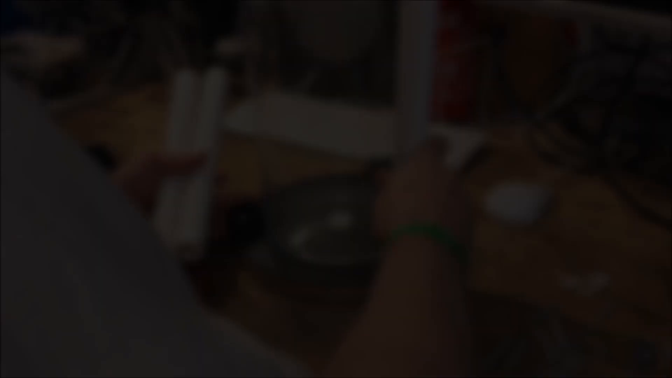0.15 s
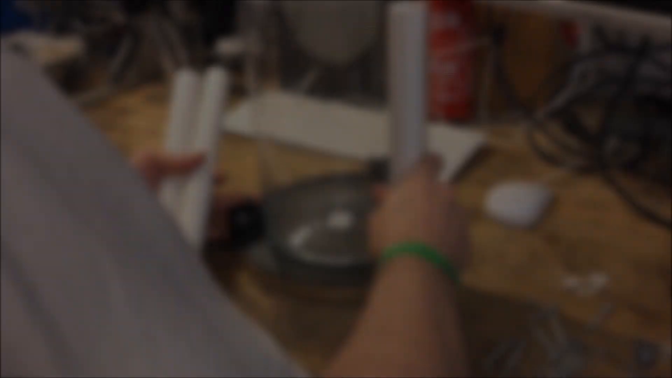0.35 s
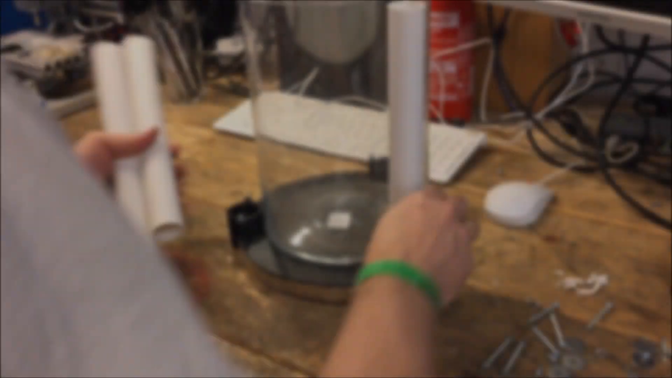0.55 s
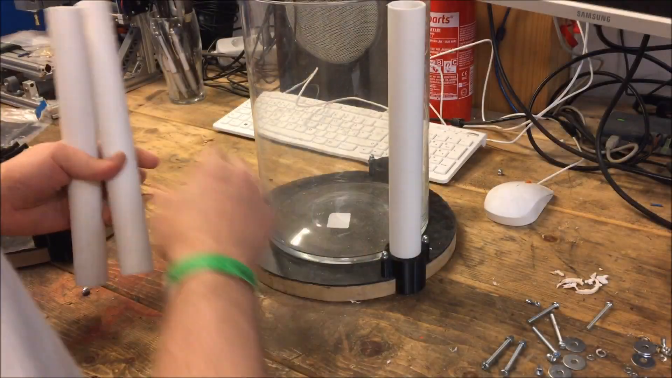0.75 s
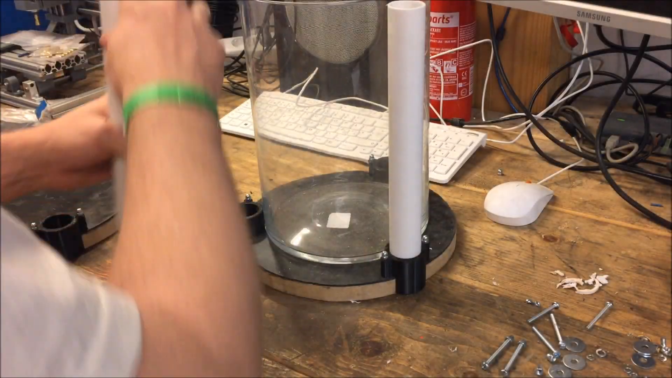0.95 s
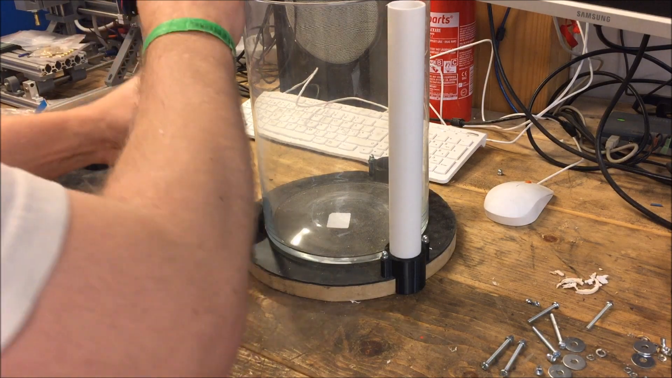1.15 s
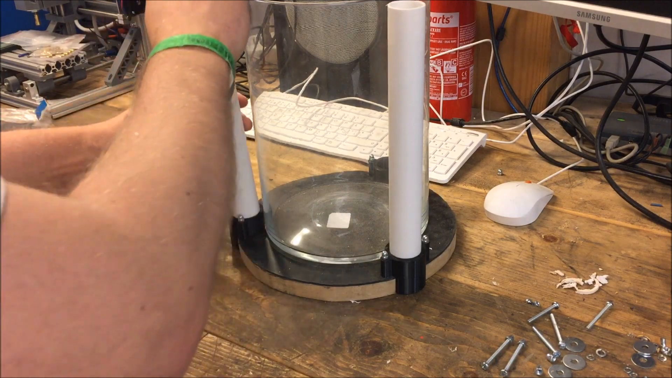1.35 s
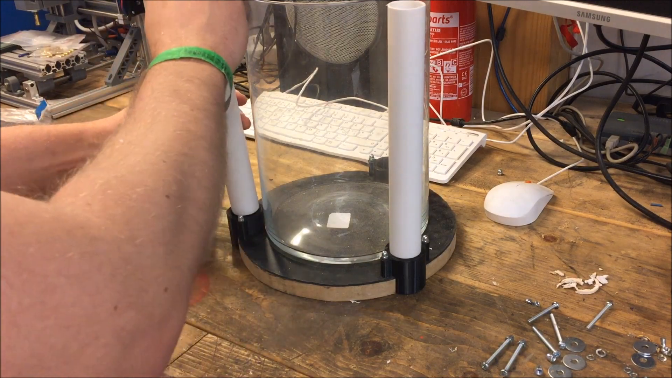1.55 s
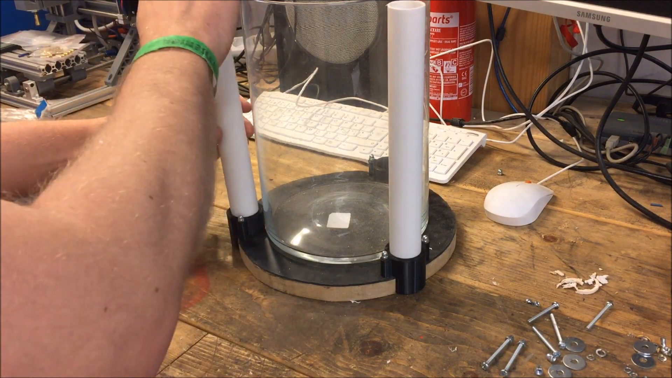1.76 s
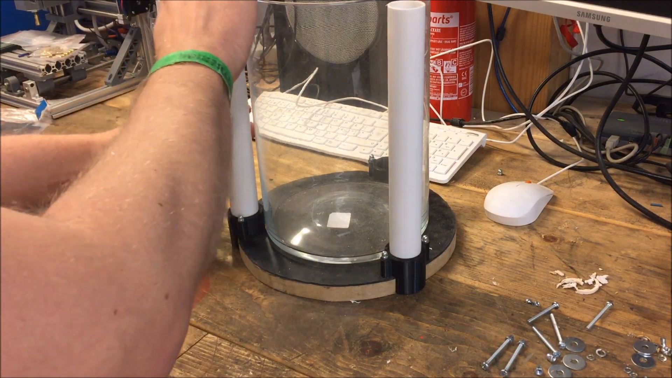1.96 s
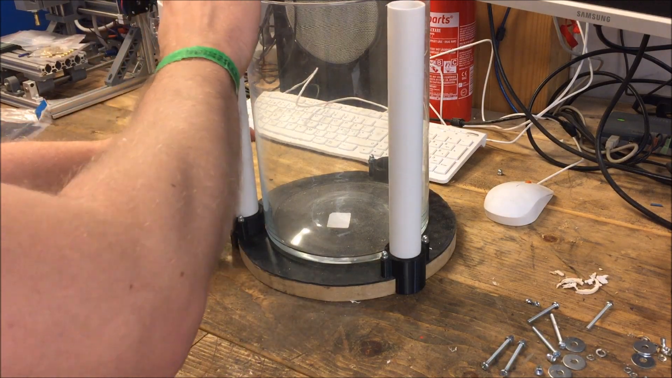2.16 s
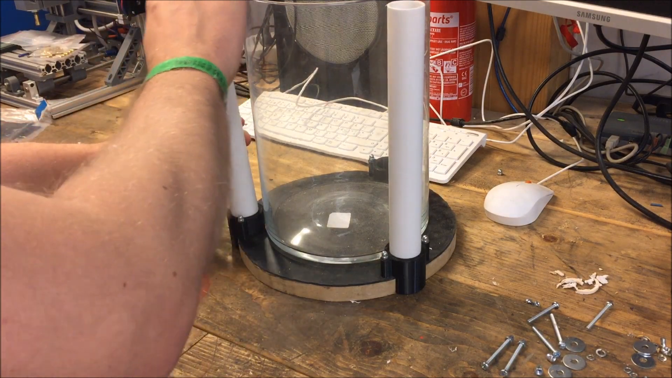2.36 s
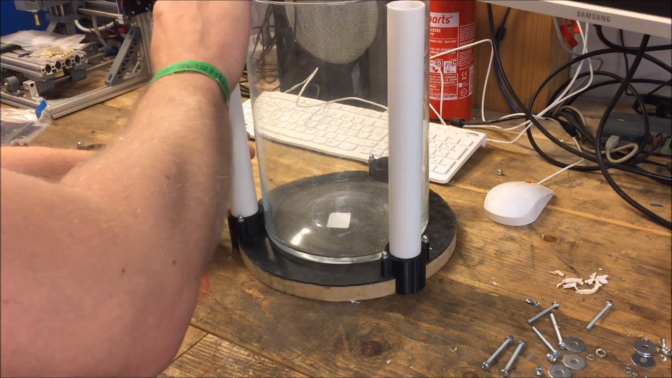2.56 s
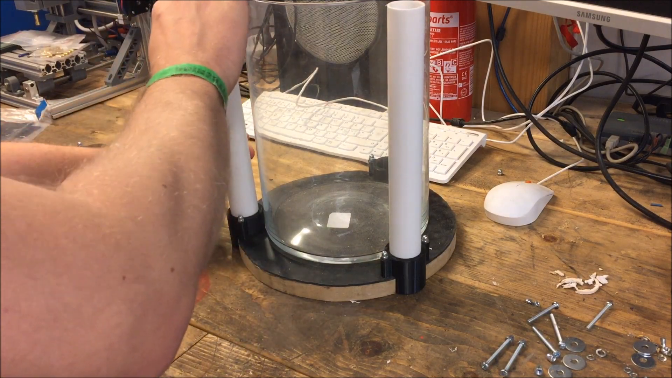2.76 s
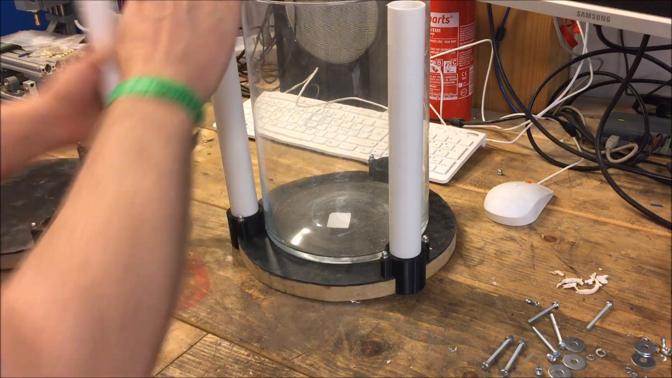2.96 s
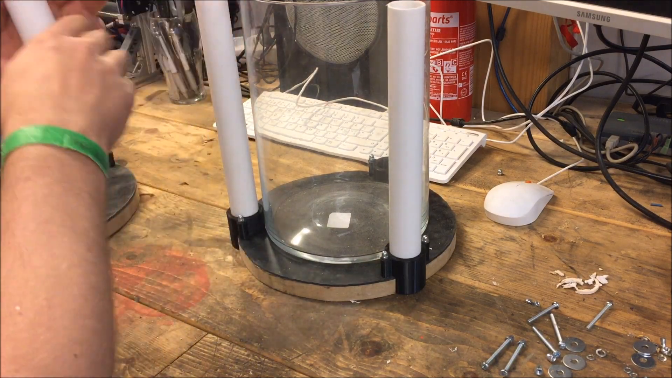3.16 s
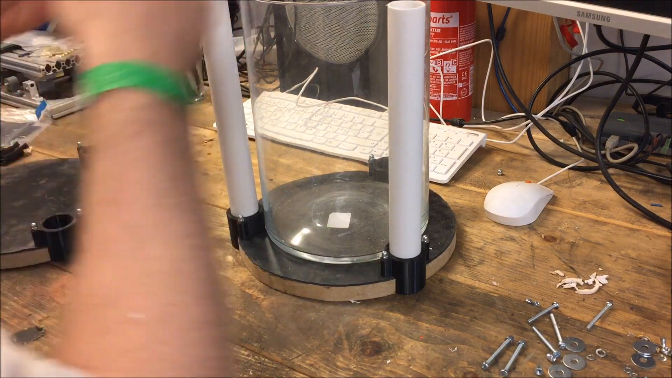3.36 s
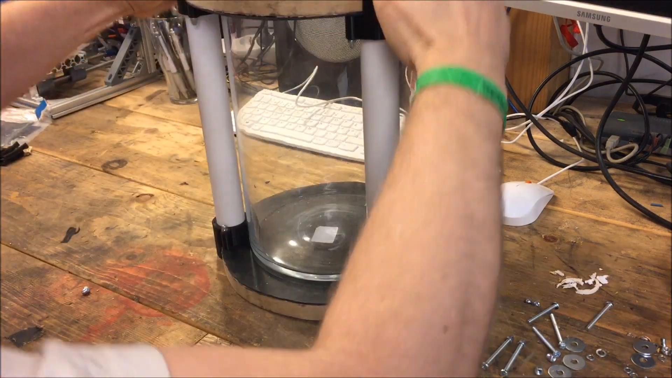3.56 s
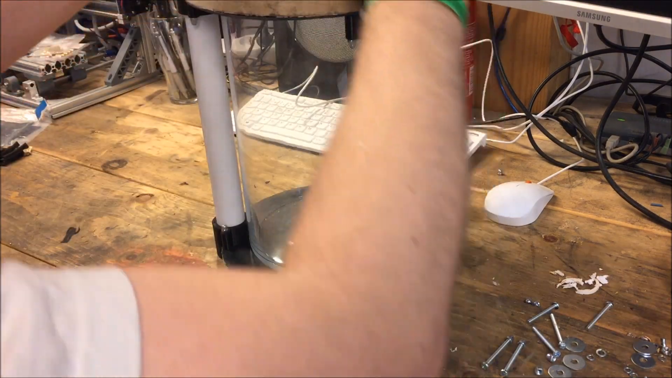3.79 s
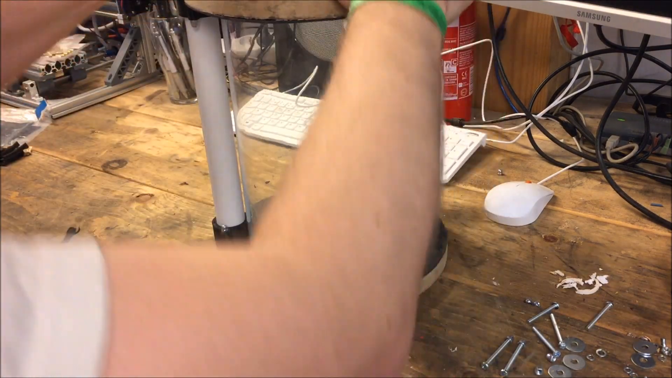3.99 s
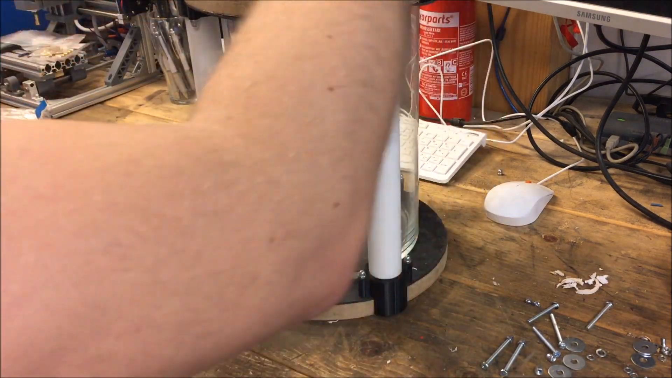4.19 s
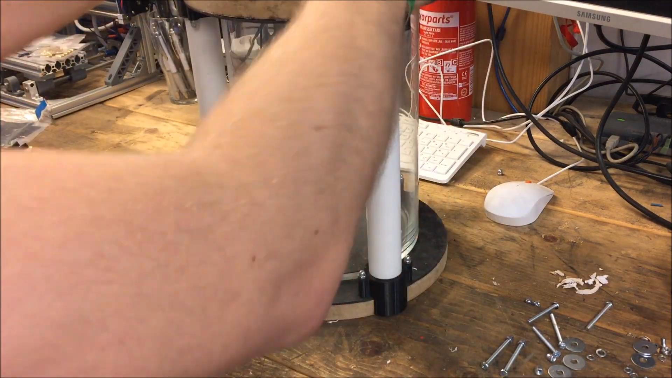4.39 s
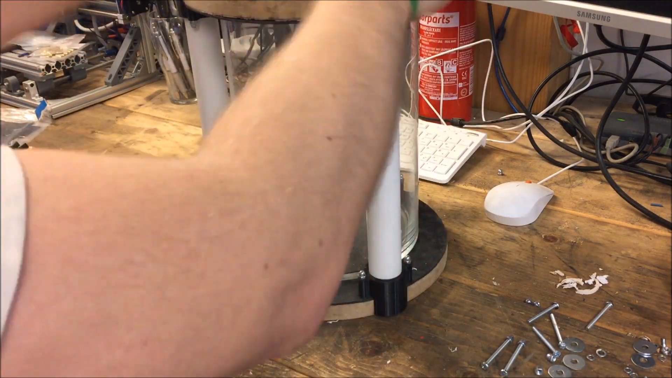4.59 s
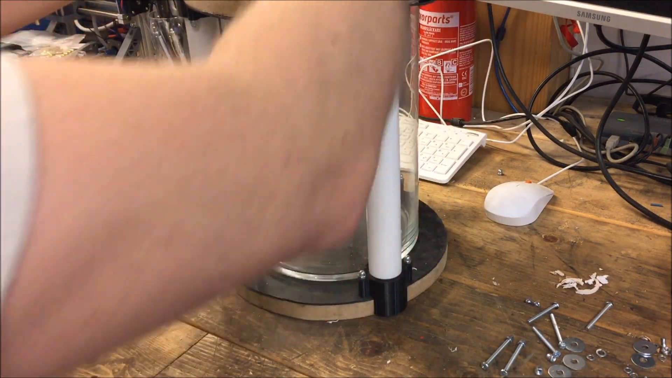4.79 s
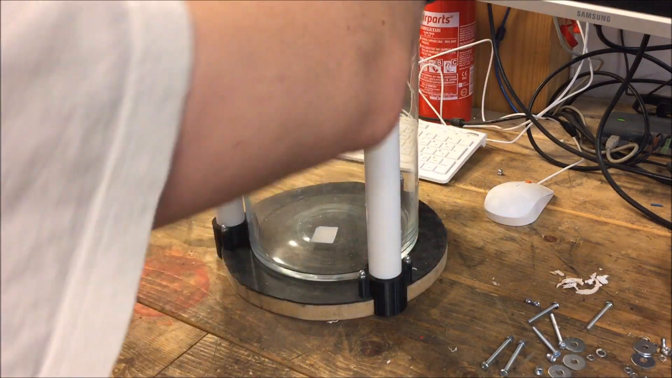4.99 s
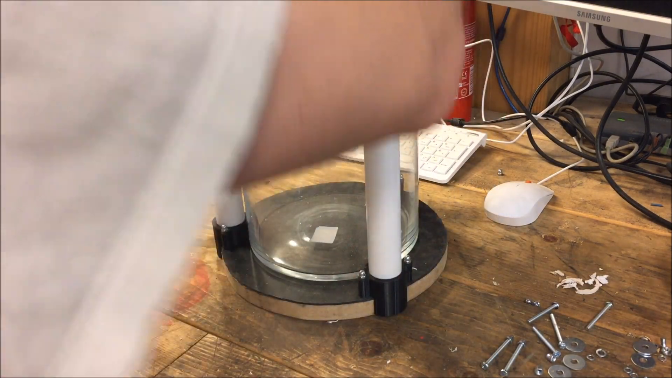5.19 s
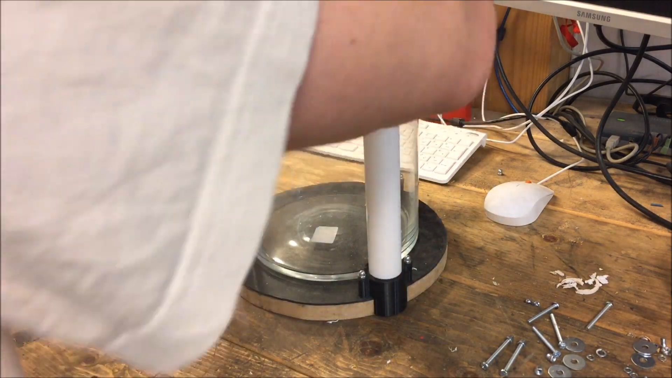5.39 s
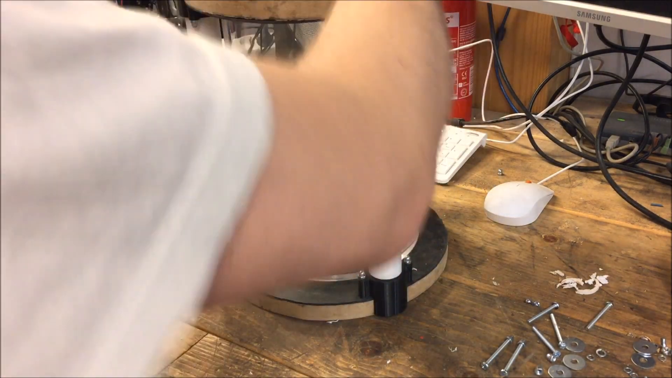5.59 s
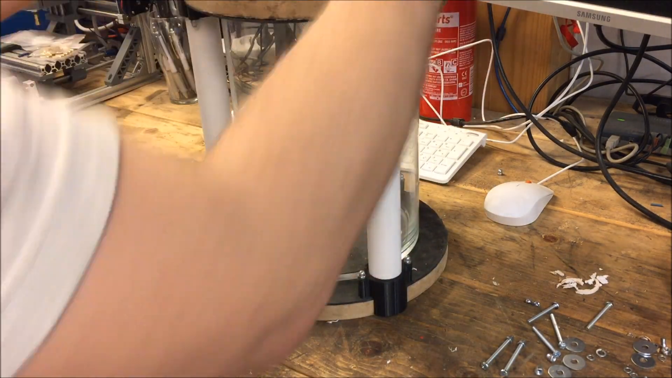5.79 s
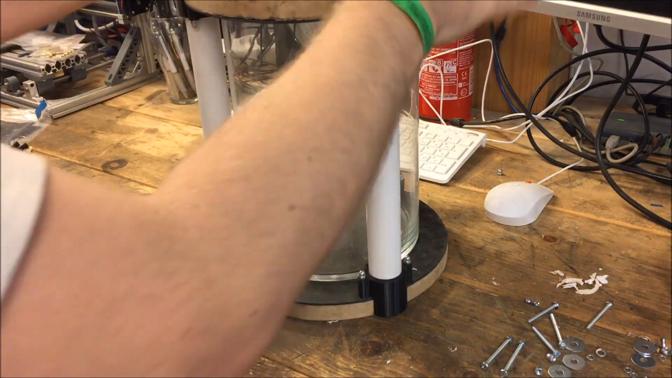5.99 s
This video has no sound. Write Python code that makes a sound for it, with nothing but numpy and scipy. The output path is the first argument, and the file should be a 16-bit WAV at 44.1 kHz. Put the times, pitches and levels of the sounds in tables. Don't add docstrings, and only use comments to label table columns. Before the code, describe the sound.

A small workshop, close microphone, with constant soft fan rush and two low motor hums beating several times a second. At about 0.4 s a short scrape ends in a bright crack and hollow plastic knock. Fine, fluttery hand rubs on plastic follow from 0.6 to 1.5 s. Small dry clicks and light hollow taps come at 1.6-1.75 s, then a crisp tap with a faint clear glass ring and buzz at 2.1 s. A firm pipe thud seats at 2.67 s. Hands rustle around 3-3.5 s. At 3.6 s a wooden plate lands loudly, hollow and rattling, with a duller glass ring. A light tick at 4.1 s, a knock at 4.47 s and a softer double knock near 4.74 s bring low bench booms. Soft shifting friction leads to a thud at 5.14 s, the hardest, sharpest crack at 5.4 s, a heavy booming blow at 5.7 s and a last low knock at 6.0 s.

```python
import sys
import numpy as np
from scipy import signal
from scipy.fft import rfft, irfft
from scipy.io import wavfile
from scipy.ndimage import uniform_filter1d

SR = 44100
rng = np.random.default_rng(int(sys.argv[2]) if len(sys.argv) > 2 else 0)


def attenuation_scalar(level_db):
    decades = np.asarray(level_db, float) / 20
    return 10 ** decades


def digitize_waveform(pressure):
    field = np.atleast_2d(pressure).T
    bounded = np.clip(field, -1, 1)
    quanta = np.round(bounded * 32767).astype(np.int16)
    wavfile.write(sys.argv[1], SR, quanta)


N = 266319


def evened(x):
    return x / np.sqrt(np.mean(x ** 2) + 1e-20)


def read(points, hz):
    f, value = np.transpose(points)
    return np.interp(np.log(hz + 1), np.log(f + 1), value)


def add(mix, start_s, sound):
    part = mix[round(start_s * SR):][:len(sound)]
    part += sound[:len(part)]


def colour(points, size, hz=1e3, lift_db=0, tilt_db=0):
    f = np.fft.rfftfreq(size, 1 / SR)
    octaves = np.log2((f + 20) / hz)
    lift = lift_db * np.exp(-(octaves / .5) ** 2)
    return evened(attenuation_scalar(read(points, f) + lift + tilt_db * octaves))


def coloured(gain):
    white = rng.standard_normal(2 * len(gain) - 2)
    return evened(irfft(rfft(white) * gain))


def ring(modes, t, spread_db, tilt_db=0, factor=1):
    luck = rng.standard_normal((len(modes), 2))
    total = 0
    for (hz, db, t60), (louder, sharper) in zip(modes, luck):
        level_db = db + spread_db * louder + tilt_db * np.log2(hz / modes[0][0])
        pitch_hz = hz * factor * (1 + 0.0024 * spread_db * sharper)
        total = total + attenuation_scalar(level_db - 60 * t / t60) * np.sin(2 * np.pi * pitch_hz * t)
    return total


# pitch_hz, level_db (per Hz)
FAN = [(18, -27), (30, -30), (93, -1), (121, -8.5), (153, -10.5), (336, -13.5), (415, -19.5), (540, -26.5),
       (666, -13.5), (760, -21.5), (1430, -17.5), (1960, -10.5), (4910, -34.5), (13000, -48.5),
       (16000, -47.5)]


def fan_rush():
    hz = np.fft.rfftfreq(1024, 1 / SR)
    a, b, patches = rng.standard_normal((N // 256 + 5, 513, 3)).T
    patches = evened(uniform_filter1d(uniform_filter1d(patches, 14, 0), 10, 1))
    frames = (a + 1j * b) * attenuation_scalar(read(FAN, hz)[:, None] + 2.5 * patches)
    rush = signal.istft(frames, nperseg=1024, noverlap=768)[1][:N]
    return attenuation_scalar(-52) * evened(rush)


# pitch_hz, width_hz, level_db
WHISTLES = [(406, 16.4, -62.5), (680, 45, -70), (840, 31, -69.5), (1952, 300, -59.5)]


def fan_whistles():
    t, out = np.arange(N) / SR, np.zeros(N)
    for hz, width_hz, db in WHISTLES:
        r = np.exp(-np.pi * width_hz / SR)
        white = rng.standard_normal(N) + 1j * rng.standard_normal(N)
        drift = signal.lfilter([1], [1, -2 * r, r * r], white)
        out += attenuation_scalar(db) * evened((drift * np.exp(2j * np.pi * hz * t)).real)
    return out


# pitch_hz, level_db
HUMS = [(100.03, -54.5), (105.65, -57)]


def motor_hums():
    t = np.arange(N) / SR - .603
    return sum(np.sqrt(2) * attenuation_scalar(db) * np.cos(2 * np.pi * hz * t) for hz, db in HUMS)


# centre_s, level_db, half_length_s
LEANS = [(.25, -69, .25), (.59, -57, .08), (1.102, -51.5, 0.12), (1.447, -56, 0.19), (2.033, -51.5, .17),
         (2.685, -60, 0.14), (3.01, -54, 0.052), (3.62, -61, 0.22), (4.156, -50.5, .13), (4.577, -47, 0.12),
         (4.9, -51, 0.2), (5.468, -53, .15), (5.949, -49.5, .3)]


def bench_tremble():
    t = np.arange(N) / SR
    wander = evened(uniform_filter1d(uniform_filter1d(rng.standard_normal(N), 4000), 4000))
    turns = np.cumsum(76 * (1 + 0.0711 * wander)) / SR
    level = attenuation_scalar(-65.5) + sum(attenuation_scalar(db) * np.exp(-((t - s) / half) ** 2) for s, db, half in LEANS)
    return np.sqrt(2) * attenuation_scalar(2.0) * level * np.sin(2 * np.pi * turns)


# firmest_s, level_db, coming_s, leaving_s
RUBS = [(.001, -68, .01, 0.15), (.33, -74, .03, .02), (.635, -55.5, 0.067, 0.096),
        (.684, -64, 0.083, 0.036), (.8, -63.5, 0.058, .04), (.924, -58, .04, 0.02), (.994, -68, .05, .05),
        (1.058, -53.5, 0.014, 0.063), (1.125, -65, .02, 0.13), (1.19, -60, 0.018, 0.17),
        (1.388, -65, 0.02, 0.037), (1.464, -69, .028, .015), (2.778, -60, .009, .016),
        (2.95, -63, 0.032, .04), (3.005, -68, .03, .03), (3.08, -62.5, 0.11, 0.15),
        (3.296, -59, .034, .023), (3.336, -52, 0.022, 0.035), (3.448, -55, 0.076, 0.035),
        (3.56, -68, .14, 0.038), (4.062, -71, .09, .03), (4.2, -78, 0.083, .09)]
# pitch_hz, level_db (per Hz)
SKIN = [(2500, -17), (5000, -3.5), (9000, -1.5), (13000, 0.5), (15500, 1)]


def hand_rubs():
    t, level = np.arange(N) / SR, np.zeros(N)
    for s, db, come, leave in RUBS:
        away = np.maximum((s - t) / come, (t - s) / leave)
        level += attenuation_scalar(db - 20 * away)
    flutter = evened(uniform_filter1d(rng.standard_normal(N), 120))
    slips = rng.exponential(1, N) * (rng.random(N) < 150 / SR)
    flecks = uniform_filter1d(6 * slips, 40)
    hiss = coloured(colour(SKIN, 2 ** 19))[:N]
    return level * hiss * attenuation_scalar(1.7 * flutter) * (1.0 + flecks)


# start_s, level_db (peak), pitch_hz, t60_s
BOOMS = [(.395, -31, 58.3, .2), (1.64, -45, 60.7, .3), (2.667, -36, 61.6, 0.4), (3.609, -31.5, 63.4, 0.61),
         (3.86, -42, 67, 0.17), (4.1, -41, 57.7, .32), (4.475, -19.5, 56.6, .26), (4.741, -14.5, 60.2, .21),
         (5.141, -25.5, 59.1, 0.39), (5.4, -17.5, 60.1, 0.18), (5.7, -12.5, 60.5, 0.23),
         (5.41, -33, 151.6, 0.46), (4.49, -37, 149.4, 0.5), (6.017, -23, 75, .3)]


def bench_booms():
    out, t = np.zeros(N), np.arange(SR // 2) / SR
    swing_up_s = 0.045
    for s, db, hz, t60 in BOOMS:
        rise = np.sin(np.pi / 2 * np.minimum(t / swing_up_s, 1))
        decay = attenuation_scalar(-60 * np.maximum(t - swing_up_s, 0) / t60)
        shape = uniform_filter1d(rise * decay, 900)
        add(out, s, attenuation_scalar(db) * shape * np.sin(2 * np.pi * hz * t))
    return out


# pitch_hz, t60_s
ROOM = [(60, 1), (160, 0.61), (420, 0.38), (1100, 0.55), (2900, 0.39), (7700, 0.3), (14000, 0.23)]


def room(x, early_db):
    taps = np.zeros(SR)
    at = np.arange(80, SR - 12, 12)
    places = at + rng.integers(0, 12, len(at))
    signs = rng.choice([-1., 1.], len(at))
    taps[places] = signs * (1 + attenuation_scalar(early_db - 60 * at / SR / 0.041))
    hz, t, z = signal.stft(taps, SR, nperseg=256)
    tail = signal.istft(z * attenuation_scalar(-60 * t / read(ROOM, hz)[:, None]), SR, nperseg=256)[1]
    return signal.fftconvolve(x, tail / np.linalg.norm(tail))[:N]


# pitch_hz, level_db, t60_s
GLASS = [(1104, 2.5, .46), (1669, -9, .35), (2293, -2, .28), (2697, -6, .2), (2840, -6, .12),
         (3375, -2, .28), (3774, -7, .75), (3838, -12, .3), (4165, -14, .23), (4390, -8, .33),
         (5195, -17, .3), (6202, -13, .27), (6686, -8, .1), (6998, -15, .2)]
# start_s, level_db, tilt_db (per octave), pitch_hz (lowest), damping_db (per s)
GLASS_TAPS = [
    (2.105, -35.5, 2.5, 1105, 31),
    (3.611, -25.5, -7.5, 1079, 163),
]


def glass():
    out, t = np.zeros(N), np.arange(SR // 2) / SR
    for s, db, tilt_db, hz, damping_db in GLASS_TAPS:
        shape = attenuation_scalar(db - damping_db * t) * (1 - np.exp(-t / 0.005))
        add(out, s, shape * ring(GLASS, t, 0, tilt_db, hz / GLASS[0][0]))
    return out


# start_s, end_s, start_db, end_db, tilt_db (per octave)
SLIDES = [(0.334, .358, -50, -45, -3.5), (.363, 0.393, -46, -22, 1.5), (1.636, 1.655, -39, -49, 3.5),
          (1.74, 1.753, -41, -43, -1.5), (2.623, 2.667, -40.5, -37.5, -.1),
          (3.593, 3.618, -36.5, -14, -3.5), (4.084, 4.106, -53.5, -37.5, -3),
          (4.46, 4.482, -36.5, -41, -0.5), (4.727, 4.762, -46, -55, 2.5), (4.842, 5.063, -43, -54, -9),
          (5.1318, 5.142, -34.5, -22.5, 3.5), (5.387, 5.397, -27, -13.5, 2), (5.688, 5.702, -38, -26, -3.5),
          (6.003, 6.015, -46, -28, 4), (6.017, 6.029, -33, -42, 1.5)]
# pitch_hz, level_db (per Hz)
EDGE = [(150, -23.5), (400, -0.5), (1000, -2.5), (2000, -5.5), (3500, -8), (6000, -15), (10000, -19.5),
        (16000, -29)]


def slides():
    out = np.zeros(N)
    for start, end, first_db, last_db, tilt_db in SLIDES:
        size = round((end - start) * SR)
        hiss = coloured(colour(EDGE, 16384, tilt_db=tilt_db))[:size]
        level = attenuation_scalar(np.linspace(first_db, last_db, size))
        add(out, start, level * hiss * signal.windows.tukey(size, .15))
    return out


# start_s, level_db (peak), pitch_hz (brightest), tilt_db (per octave)
TICKS = [
    (1.461, -29, 3380, -1.5),
    (1.6305, -14.5, 1690, -1),
    (1.638, -18.5, 3460, 3.5),
    (1.7405, -26, 2500, -4.5),
    (1.7492, -14, 2630, -2.6),
    (2.702, -23, 1200, -10),
    (5.3934, 2.5, 2320, 2.5),
]
CRACKS = [(.393, -13, 3360, -1.1), (1.6195, -25, 1900, -3), (1.72, -25.5, 1310, -6), (2.104, -12, 2770, 4),
          (2.6645, -22.5, 2020, 0.8), (2.91, -43, 2900, -1), (3.292, -33, 5960, 3.5),
          (4.0955, -31.5, 2000, 0.7), (4.4708, -14, 1930, -5), (4.4754, -22, 1240, 1.2),
          (4.73, -36.5, 4200, -7), (4.745, -30, 2670, 4.5), (5.1335, -26, 2820, 5),
          (5.1385, -9.5, 1900, -3.2), (5.692, -14, 2100, 1.1), (5.722, -23, 1500, -2),
          (6.013, -12, 2920, -2.5), (6.0205, -18, 2700, 2.2)]
RATTLES = [
    (2.107, -21, 5260, 3),
    (2.13, -36, 6140, 2.5),
    (2.196, -35, 3300, -1.3),
    (3.606, -16, 1710, 0.9),
    (5.396, -11.5, 1994, -8),
    (5.696, -18.5, 1450, -3),
]


def cracks():
    near, walls, t = np.zeros(N), np.zeros(N), np.arange(4096) / SR
    for rows, t60 in (TICKS, .0065), (CRACKS, .013), (RATTLES, .034):
        for s, db, hz, tilt_db in rows:
            gain = colour(EDGE, 4096, hz, lift_db=8, tilt_db=tilt_db)
            shape = (1 - np.exp(-t / 0.00028)) * attenuation_scalar(-60 * t / t60)
            burst = attenuation_scalar(db - 2) * shape * coloured(gain)
            add(near, s, burst)
            click = np.roll(irfft(gain), 256)[:512]
            add(walls, s - 256 / SR, np.linalg.norm(burst) * click)
    return near, walls


def knocks(hits, modes, cycles, chatter_t60):
    out, t = np.zeros(N), np.arange(SR // 3) / SR
    for s, db, hz, ring_db in hits:
        t60 = (cycles[0] - cycles[1] * db) / hz
        build = 1 - np.exp(-1.5 * hz * t)
        thud = build * attenuation_scalar(-60 * t / t60) * np.sin(2 * np.pi * hz * t)
        chatter = attenuation_scalar(-60 * t / chatter_t60) * rng.standard_normal(len(t))
        hollow = signal.fftconvolve(ring(modes, t, spread_db=1.2), chatter)[:len(t)]
        add(out, s, attenuation_scalar(db) * (thud / abs(thud).max() + attenuation_scalar(ring_db) * hollow / abs(hollow).max()))
    return out


# start_s, level_db (peak), pitch_hz (thud), ring_db (against the thud)
PIPE_HITS = [(.343, -33, 680, -18), (.3655, -24.5, 750, -7), (.3932, -11.5, 578, -12.5),
             (.397, -19, 675, -6.5), (.400, -17, 281, -9.5), (1.448, -37, 470, 1.7),
             (1.618, -29.5, 520, -7), (1.638, -26.5, 293, 2.5), (1.722, -36, 470, -4),
             (1.741, -26.5, 510, 2), (1.941, -40, 266, -3.5), (2.106, -34.5, 391, 2.8),
             (2.6655, -10.5, 660, -6.5), (2.671, -15, 411, -9.5), (2.7025, -22.5, 786, -8.5),
             (2.91, -44, 342, -2), (3.01, -48.5, 550, -3)]
# pitch_hz, level_db, t60_s
PIPE = [(264.4, 2.5, 0.084), (400, -2, 0.042), (438, -6, 0.045), (590, -4.5, 0.078), (680, -2.5, 0.027),
        (805, -15, 0.037), (900, -11, 0.051)]


def pipes():
    return knocks(PIPE_HITS, PIPE, cycles=(2.7, 0.52), chatter_t60=0.12)


# start_s, level_db (peak), pitch_hz (thud), ring_db (against the thud)
PLATE_HITS = [(3.594, -24, 690, -2), (3.608, -7.5, 470, -5.5), (3.610, -6, 233, -17),
              (4.095, -34.5, 334, 0), (4.476, -14.5, 284, -7), (4.731, -36.5, 480, 2),
              (4.744, -23.5, 198, -4.5), (4.764, -29, 517, 3), (5.143, -15, 400, -8.5),
              (5.146, -20.5, 143.6, -24.5), (5.158, -25.5, 210, -19), (5.3932, -4, 1110, -15.5),
              (5.400, -15, 297, -6.5), (5.696, -14.5, 594, -6), (5.700, -10, 156.3, -16),
              (6.016, -35, 400, 0), (6.018, -15, 122, -10.5)]
# pitch_hz, level_db, t60_s
PLATE = [(144.4, -4.5, 0.12), (195, -7, 0.062), (282.7, -6, 0.064), (378, -11.5, 0.091), (470, -13, 0.038),
         (590, -7, 0.054), (680, -9.5, 0.05), (827, -14, 0.032), (1052, -20.5, 0.041), (1190, -22, 0.052)]


def plate():
    return knocks(PLATE_HITS, PLATE, cycles=(4, 0.072), chatter_t60=0.2)


def scene():
    steady = fan_rush() + fan_whistles() + motor_hums()
    near, walls = cracks()
    scrapes, rings = slides(), glass()
    hollow = pipes() + plate()
    wet = attenuation_scalar(-6) * room(walls + attenuation_scalar(-3) * scrapes + rings / 5, early_db=9.0)
    wet += attenuation_scalar(-11.0) * room(hollow, early_db=4.0)
    contacts = near + scrapes + rings + hollow + wet
    return (contacts + bench_booms() + bench_tremble() + hand_rubs() + steady)[None]


def band_limit(x):
    return signal.sosfilt(signal.butter(12, 16400, fs=SR, output="sos"), x)


def record(dry):
    bass_cut = signal.butter(3, 38, "high", fs=SR, output="sos")
    top_cut = signal.firwin(255, 15800, window=("kaiser", 8), fs=SR)
    heard = np.clip(signal.sosfilt(bass_cut, dry), -1, 1)
    heard = signal.oaconvolve(heard, top_cut[None], "same")
    mix = np.clip(heard, -1, 1)
    return band_limit(mix)


dry = scene()
out = record(dry)
digitize_waveform(out)
```